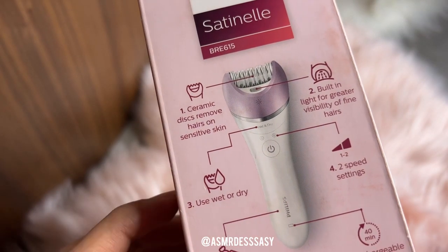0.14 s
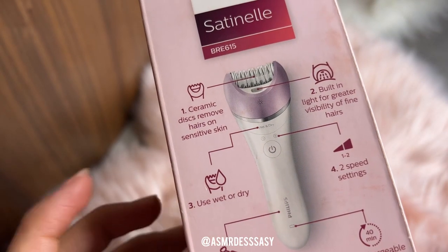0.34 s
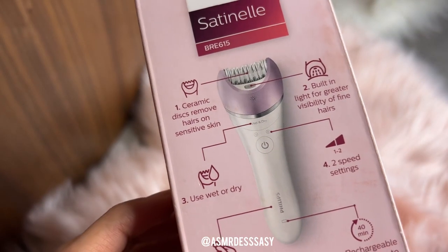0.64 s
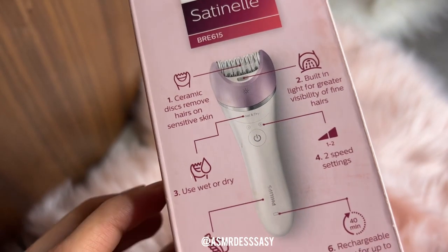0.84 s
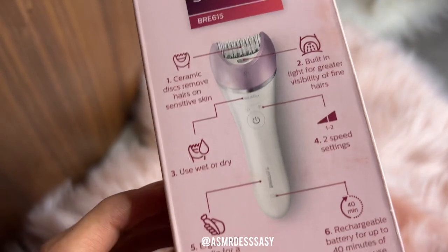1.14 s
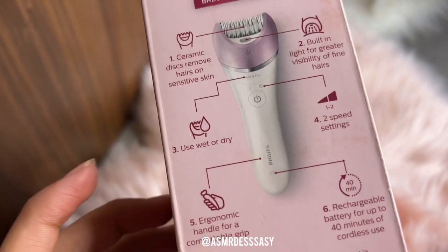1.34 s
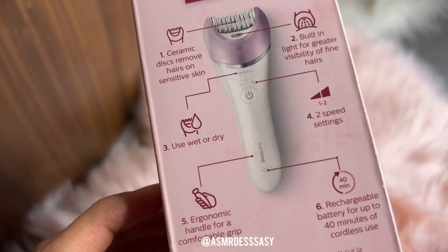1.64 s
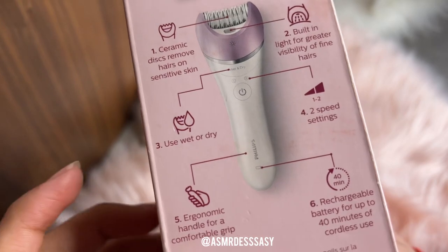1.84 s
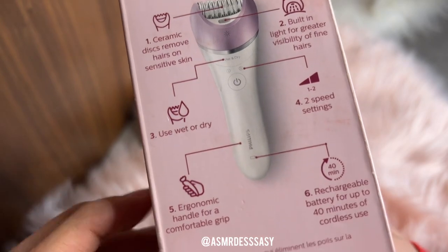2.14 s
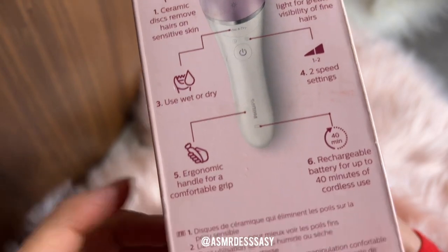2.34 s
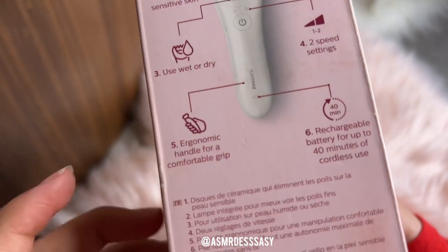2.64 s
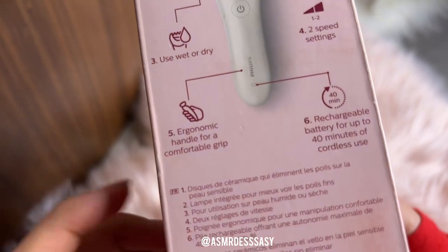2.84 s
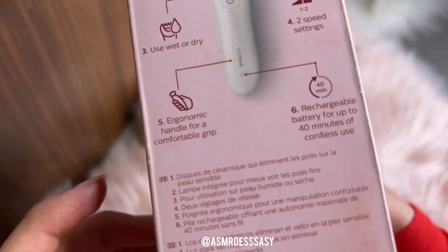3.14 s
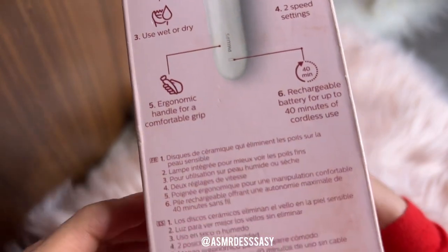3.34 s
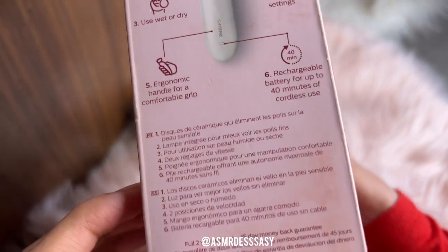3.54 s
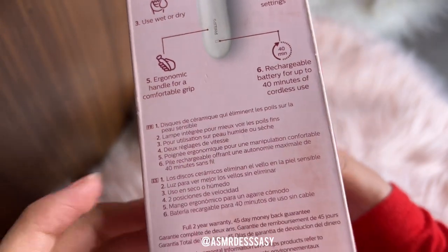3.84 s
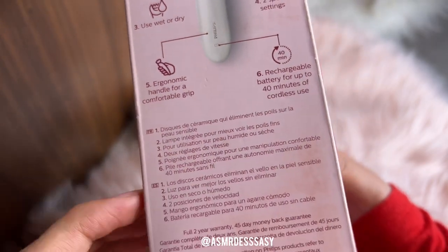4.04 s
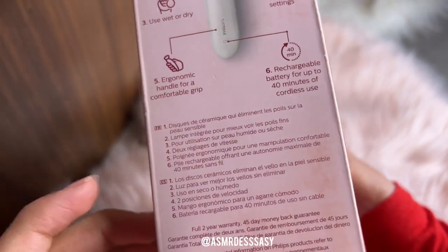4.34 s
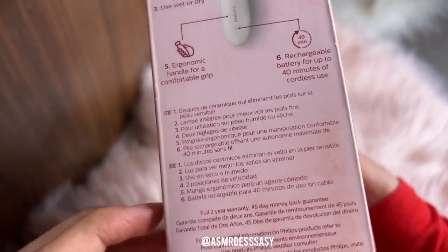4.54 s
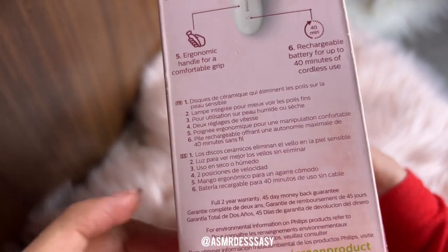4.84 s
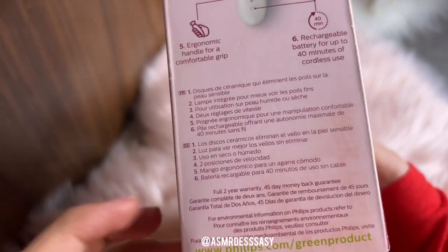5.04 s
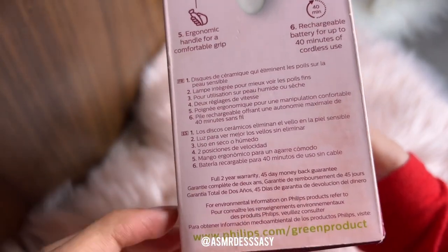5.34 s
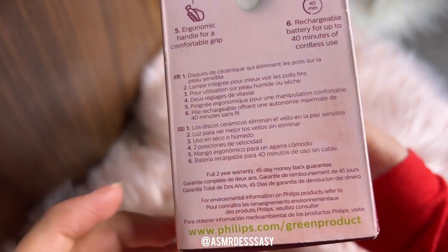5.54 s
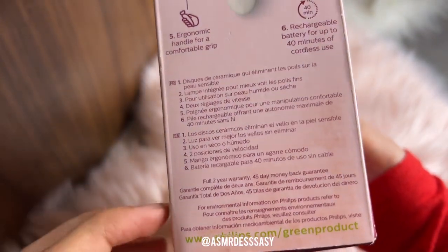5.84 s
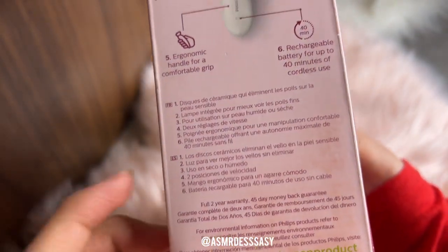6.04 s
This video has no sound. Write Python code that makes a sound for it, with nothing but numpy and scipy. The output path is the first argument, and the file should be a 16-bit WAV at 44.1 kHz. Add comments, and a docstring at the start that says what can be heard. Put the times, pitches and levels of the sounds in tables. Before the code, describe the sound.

Fingernails tap a small cardboard box very close to the microphone in a quiet room. Hollow and crisp knocks come irregularly, cluster just after two seconds, turn woodier, then pause. Brighter, clickier taps follow, sparser and mostly softer. Each is short and dry with a papery edge and a soft diffuse echo. A deep faint hum sinks away beneath light rumble and hiss.

```python
"""In a quiet room, fingernails tap unevenly on a small cardboard box held close to a microphone.
Each tap rings the damped panel modes of the spot it lands on, under a papery knock of crowded modes.
The nail adds a short bright tick and a snap, and the room answers softly with diffuse echoes.
Below lie a low hum that sinks away, a few faint wavering tones, rumble and a faint hiss."""
import sys
import numpy as np
from scipy import signal
from scipy.fft import rfft, irfft, next_fast_len
from scipy.io import wavfile

SR = 44100
rng = np.random.default_rng(int(sys.argv[2]) if len(sys.argv) > 2 else 0)


def waveform_to_disk(signal):
    """Save audio, clipped to [-1, 1], as 16-bit WAV at the path in sys.argv[1]."""
    frames = np.transpose(np.atleast_2d(signal))
    scaled = np.clip(frames, -1, 1) * 32767
    samples = np.round(scaled).astype(np.int16)
    wavfile.write(sys.argv[1], SR, samples)


N = 272979

# the four spots of the box that get tapped, named for how they sound
HOLLOW, CRISP, WOODY, BRIGHT = range(4)
TOP_HZ = 16000  # upper limit of the nail tick and of the recorder


def undb(db):
    """Decibels to gain."""
    return 10 ** (np.asarray(db) / 20)


def unit(x):
    """Scale to rms 1."""
    return x / np.sqrt(np.mean(x ** 2))


def colour(x, points):
    """Shape x by a spectrum of (Hz, dB) points, joined along log frequency."""
    hz, db = np.transpose(points)
    size = next_fast_len(len(x) + SR // 10)
    f = np.maximum(np.fft.rfftfreq(size, 1 / SR), 1)
    gain = undb(np.interp(np.log(f), np.log(hz), db))
    return irfft(rfft(x, size) * gain, size)[:len(x)]


def band(x, lo_hz, hi_hz, order=2):
    """Causal band-pass."""
    edges_hz = [lo_hz, min(hi_hz, SR / 2 - 1)]
    return signal.sosfilt(signal.butter(order, edges_hz, "band", fs=SR, output="sos"), x)


def fade(t, t60):
    """Exponential decay, 60 dB down after t60 seconds."""
    return np.exp(-np.log(1000) * t / t60)


def add(track, s, x):
    """Mix x into the track at time s."""
    start = int(round(s * SR))
    part = track[start:start + len(x)]
    part += x[:len(part)]


def strike_level(x, db):
    """Set the rms level of the first hundredth of a second."""
    return x * undb(db) / np.sqrt(np.mean(x[:SR // 100] ** 2))


def burst(t, t60, contact_db):
    """Many close, quickly damped modes of even strength, set off by one sharp contact."""
    x = rng.standard_normal(len(t)) * fade(t, t60)
    x[0] += undb(contact_db)
    # keep only the phases, so that every frequency is equally strong
    even = irfft(np.exp(1j * np.angle(rfft(x))), len(t))
    return even * fade(t, 2 * t60)


def panels(t, spot, blow_db, scatter_db=1.5):
    """The spot picks the mode weights; a fleshy blow favours low modes, a hard one high modes."""
    # Damped modes of the box panels. Each row: frequency in Hz, t60 in seconds,
    # then the signed weight (linear) when struck at the hollow, crisp, woody and bright spot.
    box_modes = np.array([(126.0, 0.049, -1.16, -0.59, -1.46, -0.01),
                          (170.0, 0.031, -0.27, -0.51, 0.19, 0.41), (209.0, 0.063, 0.2, 0.41, -0.06, -0.07),
                          (298.0, 0.052, 0.9, 0.87, 0.68, -0.98), (343.0, 0.064, 0.36, 0.19, 0.12, -0.58),
                          (406.0, 0.067, 0.36, -0.13, 0.09, -0.6), (429.0, 0.051, 0.37, -0.71, 0.52, -0.06),
                          (503.0, 0.021, -0.24, 0.46, 0.11, 0.05), (614.0, 0.035, -0.33, -0.63, 0.36, 0.59),
                          (656.0, 0.024, 0.14, -0.43, -1.1, -0.57), (729.0, 0.019, 0.56, 0.08, 0.69, -0.31),
                          (831.0, 0.026, 0.32, -0.06, 0.18, -0.74), (897.0, 0.034, 0.34, 0.18, 0.25, -0.07),
                          (927.0, 0.029, -0.17, 0.3, 0.09, 0.35), (1017.0, 0.019, 0.15, 0.26, 0.42, 0.0),
                          (1149.0, 0.024, -0.17, 0.3, -0.05, -0.01),
                          (1213.0, 0.033, -0.04, 0.12, -0.06, 0.05),
                          (1394.0, 0.022, -0.17, 0.31, -0.06, 0.16),
                          (1566.0, 0.014, -0.21, 0.26, -0.45, 0.59),
                          (1680.0, 0.02, -0.22, 0.14, -0.1, 0.32),
                          (1769.0, 0.028, -0.02, 0.02, -0.01, -0.12)])
    # Where the three parts of a blow act on the modes: thump, body and knock, in Hz.
    blow_hz = [148, 383, 1220]
    hz, t60, weight = box_modes[:, 0], box_modes[:, 1], box_modes[:, 2 + spot]
    db = np.interp(np.log(hz), np.log(blow_hz), blow_db)
    db = db + scatter_db * rng.standard_normal(len(hz))
    ringing = np.sin(2 * np.pi * hz[:, None] * t) * fade(t, t60[:, None])
    return (weight * undb(db)) @ ringing


def card(t, knock_db):
    """Weaker, crowded modes of flaps and packing give the knock a papery edge."""
    crowd = burst(t, t60=0.038, contact_db=-20)
    return strike_level(band(crowd, 407, 1544, order=4), knock_db - 14)


def edge(contact, edge_db):
    """Raise or lower the glassy band of a contact by a resonant peak."""
    centre_hz, width_hz = 6800, 5200
    peak = signal.lfilter(*signal.iirpeak(centre_hz, centre_hz / width_hz, fs=SR), contact)
    return contact + (undb(edge_db) - 1) * peak


def nail(contact, tick_db, snap_db, low_hz):
    """A contact of the hard nail rings the stiff resonances and snaps on the glossy coat."""
    # Stiff high resonances of nail and card.
    # Each row: frequency in Hz, width in Hz, level in dB relative to the others.
    stiff_modes = [(2355, 430, 17), (2835, 320, 11.5), (3210, 350, 11.5), (3790, 260, -3), (4380, 70, 10),
                   (4830, 93, 6.5), (5760, 270, -28)]
    # Spectrum of the nail edge on the glossy coat. Each row: frequency in Hz, relative level in dB.
    snap_spectrum = [(3000, -12), (5000, -5), (7200, 1), (9500, -3.5), (12000, -0.5), (16000, -12)]
    tick = np.zeros(len(contact))
    for hz, width, db in stiff_modes:
        tick += undb(db) * band(contact, hz - width / 2, hz + width / 2, order=1)
    tick = band(tick, low_hz, TOP_HZ, order=3)
    snap = colour(contact, snap_spectrum)
    return strike_level(tick, tick_db - .5) + strike_level(snap, snap_db + .5)


def tap(t, spot, strength_db, nail_db, pad_db):
    """One tap as heard beside the box, and as sent into the room: the pad thumps, the nail brightens."""
    # How each spot answers. Each row: knock, nail tick and nail snap in dB added to the tap strength,
    # gain of the glassy band in dB, lowest tick frequency in Hz.
    spot_answers = [(-7, -32.5, -43.5, -6.5, 2580), (-3, -20, -31, -2.5, 3200),
                    (1, -25.5, -44.5, -0.5, 1970), (-1.1, -19.5, -22, 7, 1800)]
    # More nail makes a brighter tap: dB gained by knock, tick and snap per dB of nail.
    nail_slope = (0.19, 0.39, 1)
    *answer_db, edge_db, low_hz = spot_answers[spot]
    knock_db, tick_db, snap_db = strength_db + np.array(answer_db) + nail_db * np.array(nail_slope)
    blow_db = [strength_db + pad_db, strength_db, knock_db]
    knock = panels(t, spot, blow_db) + card(t, knock_db)
    near_contact = edge(burst(t, t60=0.034, contact_db=10), edge_db)
    # summed over all directions the click has no notches of its own
    outward_contact = edge(signal.unit_impulse(len(t)), edge_db)
    near = nail(near_contact, tick_db, snap_db, low_hz)
    outward = nail(outward_contact, tick_db, snap_db, low_hz)
    return knock + near, knock + outward


def room(x, build_s=0.0075):
    """Diffuse echoes that build up as the sound returns from the walls, each band with its own decay."""
    # Echo bands. Each row: centre in Hz, echo gain in dB, t60 in seconds.
    echo_bands = [(70, -13, 0.33), (142, -11, 1), (306, -8.5, 0.5), (580, -9, 0.5), (1164, -12, 0.6),
                  (1570, -13, 0.51), (2300, -13.5, 1), (4930, -10.5, 0.5), (9000, -14, 0.77),
                  (16160, -11, 0.22)]
    t = np.arange(SR) / SR
    hz, db, t60 = np.transpose(echo_bands)
    log_f = np.log(np.maximum(np.fft.rfftfreq(SR, 1 / SR), 1))
    noise = rfft(rng.standard_normal(SR))
    response = np.zeros(SR)
    # each row of the identity makes one band that crossfades into its neighbours
    for share, band_db, band_t60 in zip(np.eye(len(hz)), db, t60):
        envelope = fade(t, band_t60) * (1 - np.exp(-(t / build_s) ** 2))
        echoes = irfft(noise * np.interp(log_f, np.log(hz), share), SR)
        response += undb(band_db) * echoes * envelope / np.linalg.norm(envelope)
    return signal.fftconvolve(x, response)[:len(x)]


def hum():
    """A deep sine hum that holds its level, then sinks steadily in dB to a lower one."""
    hum_hz, start_db, low_db = 28.9, -39, -55
    hold_s, sink_db_per_s = 1.7, 5
    t = np.arange(N) / SR
    db = np.maximum(start_db - sink_db_per_s * np.maximum(t - hold_s, 0), low_db)
    return np.sqrt(2) * np.sin(2 * np.pi * hum_hz * t) * undb(db)


def air():
    """Steady room rumble and hiss: noise shaped by a spectrum that falls towards the treble."""
    # Each row: frequency in Hz, relative density in dB per Hz.
    air_spectrum = [(3, 25), (7, 10.5), (14, 15), (24, -12), (42, 0.5), (60, 6), (80, -9), (130, -14.5),
                    (300, -21.5), (600, -27), (1200, -34.5), (2200, -40.5), (5000, -44.5), (16000, -50)]
    level_db = -35
    return undb(level_db) * unit(colour(rng.standard_normal(N), air_spectrum))


def far_tones():
    """A few faint, far-off sines swell and fade while their pitch wavers at random."""
    # Each row: start in seconds, length in seconds, frequency in Hz, rms level at the peak in dB.
    tone_list = [(1.645, 0.23, 622, -62), (1.717, 0.15, 724, -67), (2.98, 0.16, 1196, -69),
                 (3.84, 0.2, 625, -65), (5.597, 0.15, 735, -68)]
    waver_hz, waver_step_s = 17, 0.032
    out = np.zeros(N)
    for s, length, hz, db in tone_list:
        t = np.arange(int(length * SR)) / SR
        waver = waver_hz * np.interp(t / waver_step_s, np.arange(20), rng.standard_normal(20))
        tone = np.sqrt(2) * np.sin(2 * np.pi * np.cumsum(hz + waver) / SR)
        swell = np.sin(np.pi * t / length)
        add(out, s, undb(db) * swell * tone)
    return out


def scene(path_count=4):
    """All taps, their echoes and the background; the tapping is already under way at the start."""
    # Each row: time in seconds, spot, strength in dB, nail in dB, finger pad in dB;
    # 0 dB of nail or pad is an ordinary tap.
    tap_list = [(-.045, HOLLOW, -16.5, -23, -1.5), (.121, CRISP, -24.5, -7, -5.5),
                (.301, HOLLOW, -18, -1.5, 1), (.4655, HOLLOW, -24.5, -1, 4), (.5507, CRISP, -16.5, -1, -6),
                (.9326, HOLLOW, -21, -0.5, -1), (1.1105, CRISP, -22, 1.5, 0.5),
                (1.216, HOLLOW, -34.5, 5, -1), (1.537, CRISP, -33, 2, -3.5), (1.8736, HOLLOW, -33, -7, 1),
                (1.8863, HOLLOW, -26, 2, 10), (2.0473, CRISP, -20, 2, -1),
                (2.138, HOLLOW, -14.5, 1.5, -13.5), (2.3154, HOLLOW, -24, 11, 2.5),
                (2.410, CRISP, -30, 4, 5), (2.5743, WOODY, -22.5, -5.5, -6.5),
                (2.662, WOODY, -27, -16, -3.5), (2.710, WOODY, -25, -10, -1),
                (2.9137, WOODY, -26.5, 19, -1), (3.1826, WOODY, -22.5, -14, -4),
                (3.299, WOODY, -27, 16.5, -6), (4.0585, BRIGHT, -24.5, -2, 1), (4.290, WOODY, -36.5, 5, -1),
                (4.4386, BRIGHT, -25, 2.5, 3.5), (4.701, BRIGHT, -38.5, -13, 15),
                (4.786, BRIGHT, -39, -3.5, 13), (4.9445, BRIGHT, -32, 2.5, 4),
                (5.330, BRIGHT, -33, 0.5, 14.5), (5.5965, HOLLOW, -49, -1, 6),
                (5.763, BRIGHT, -27, 3.5, 8.5), (5.9607, BRIGHT, -35.5, -1.5, 15.5),
                (6.102, BRIGHT, -24.5, 3.5, -17)]
    t = np.arange(SR // 8) / SR
    lead_in_s = 1
    direct = np.zeros(SR * lead_in_s + N)
    radiated = np.zeros((path_count, len(direct)))
    for k, (s, *touch) in enumerate(tap_list):
        near, outward = tap(t, *touch)
        add(direct, s + lead_in_s, near)
        add(radiated[k % path_count], s + lead_in_s, outward)
    # the box keeps moving in the hands, so successive taps meet different echo paths
    echoes = sum(room(path) for path in radiated)
    taps_in_room = (direct + echoes)[SR * lead_in_s:]
    return (taps_in_room + hum() + air() + far_tones())[None]


def record(dry):
    """The recorder cuts the top with a steep low-pass."""
    return signal.sosfilt(signal.ellip(8, .2, 70, TOP_HZ, fs=SR, output="sos"), dry)


dry = scene()
out = record(dry)
waveform_to_disk(out)
```